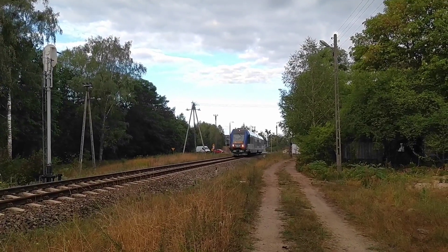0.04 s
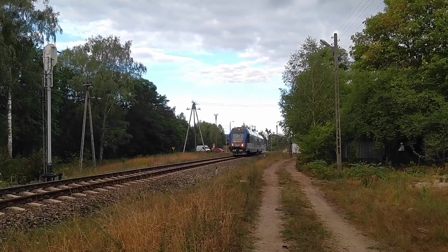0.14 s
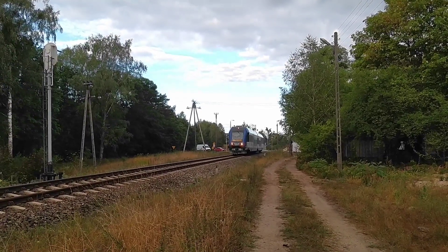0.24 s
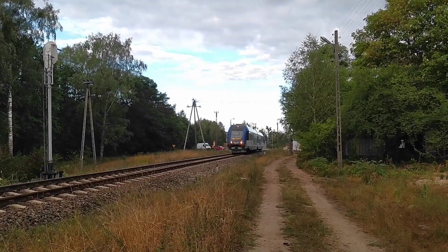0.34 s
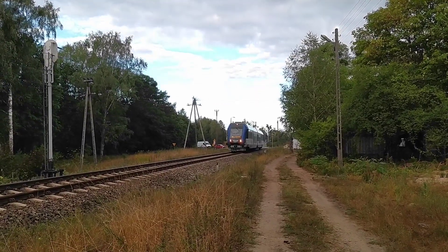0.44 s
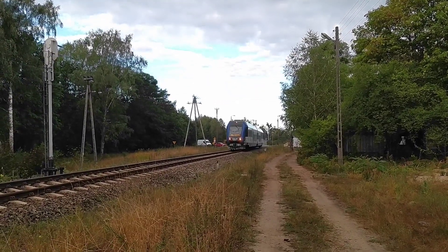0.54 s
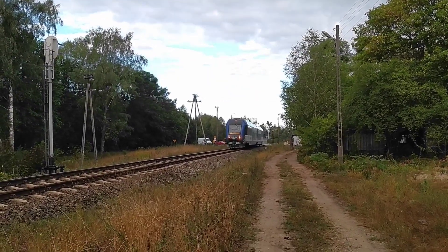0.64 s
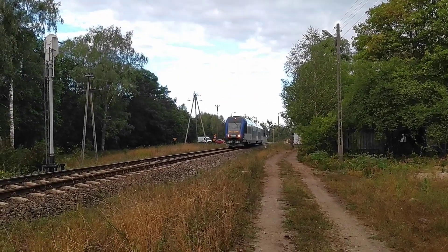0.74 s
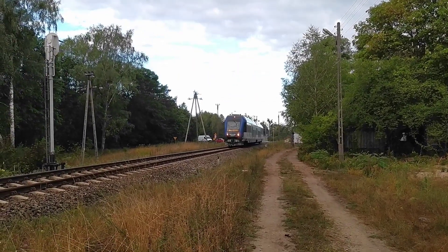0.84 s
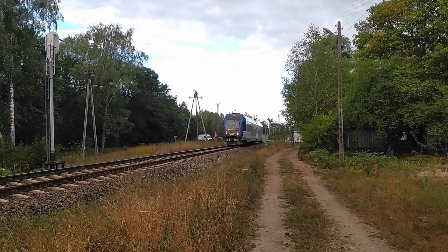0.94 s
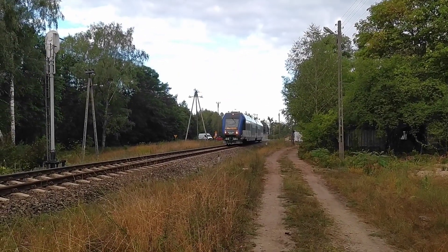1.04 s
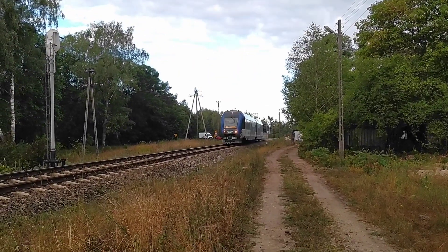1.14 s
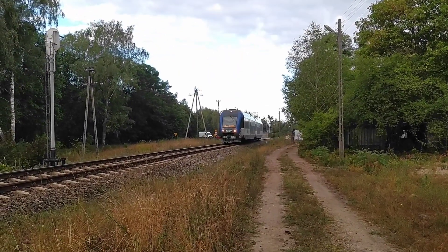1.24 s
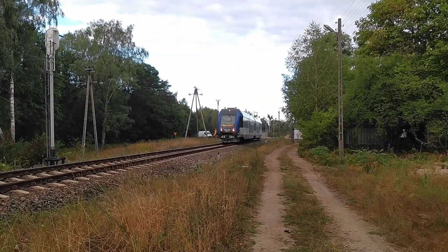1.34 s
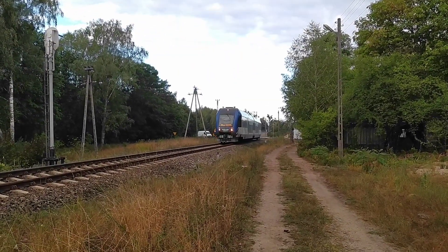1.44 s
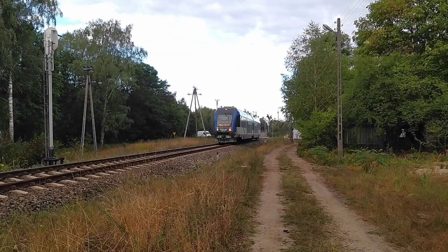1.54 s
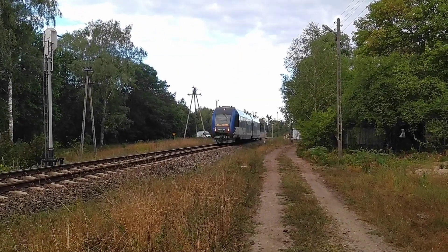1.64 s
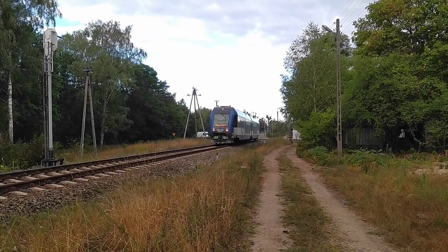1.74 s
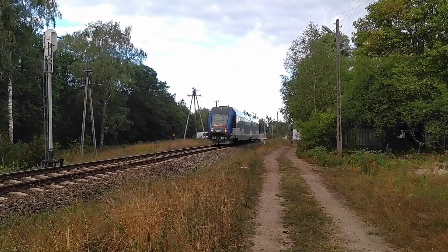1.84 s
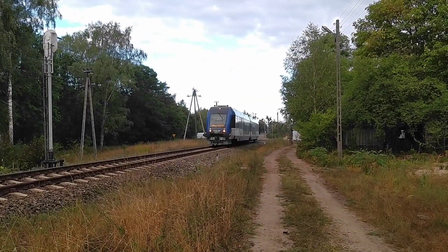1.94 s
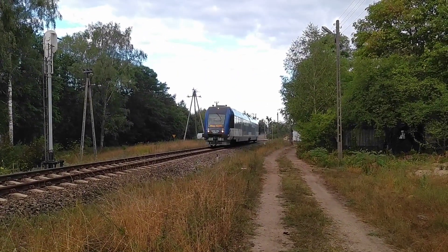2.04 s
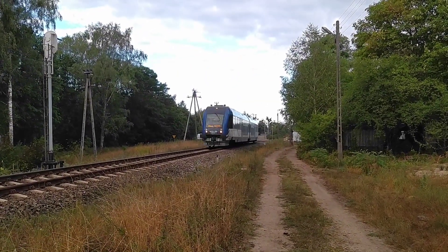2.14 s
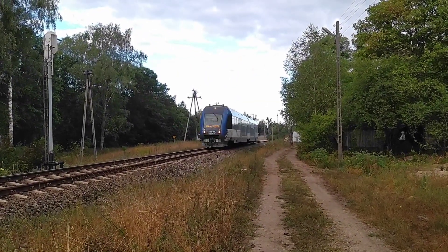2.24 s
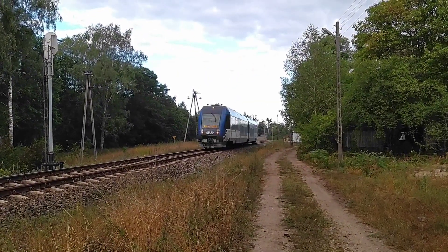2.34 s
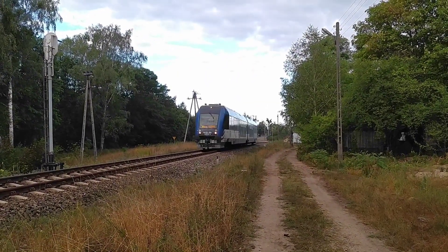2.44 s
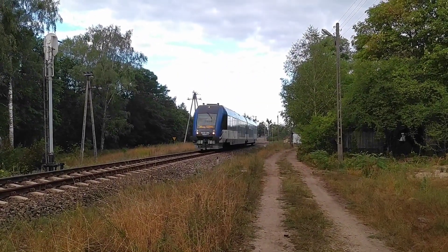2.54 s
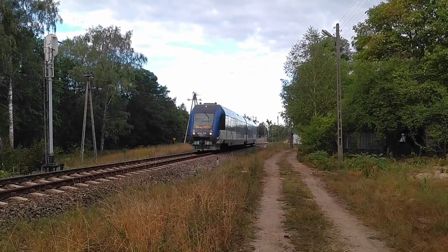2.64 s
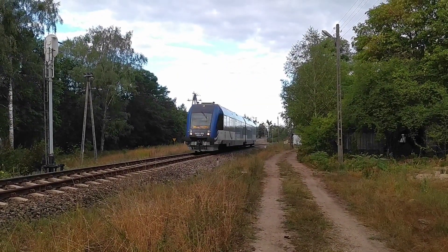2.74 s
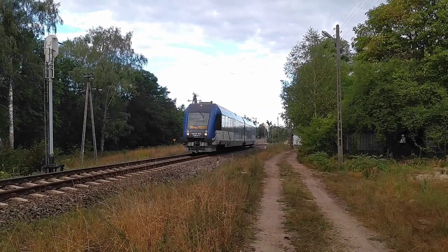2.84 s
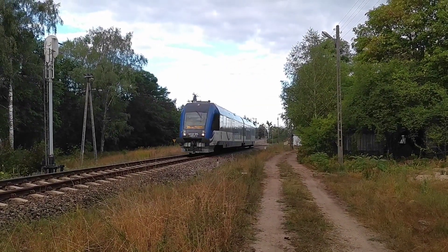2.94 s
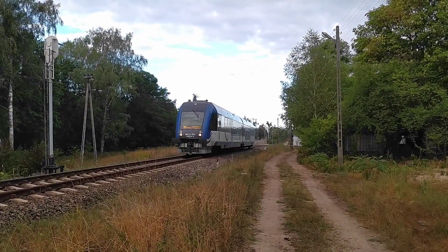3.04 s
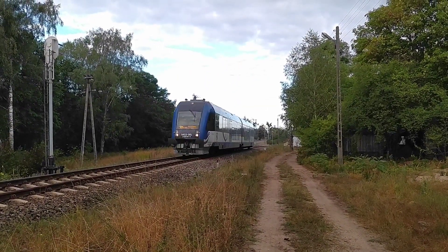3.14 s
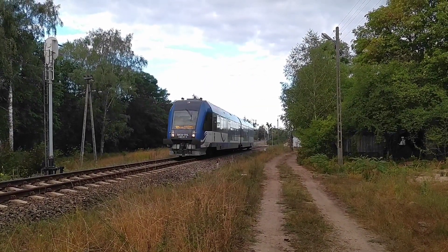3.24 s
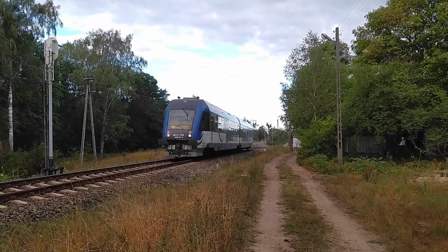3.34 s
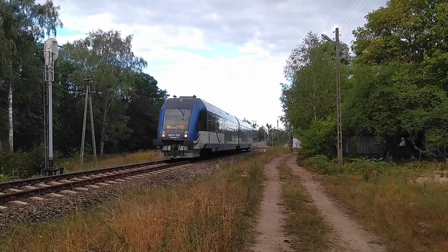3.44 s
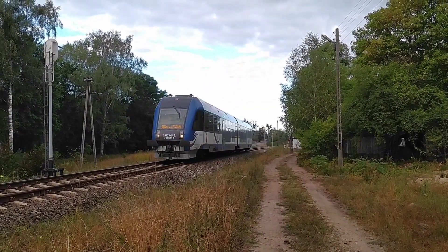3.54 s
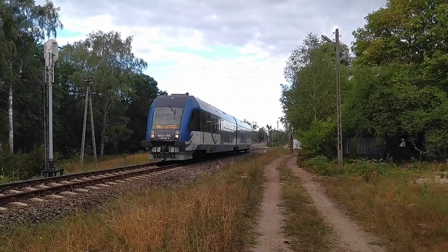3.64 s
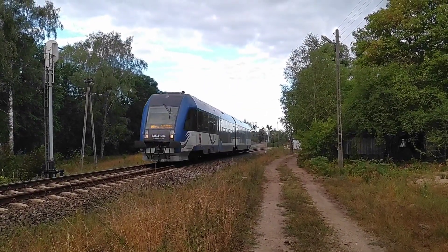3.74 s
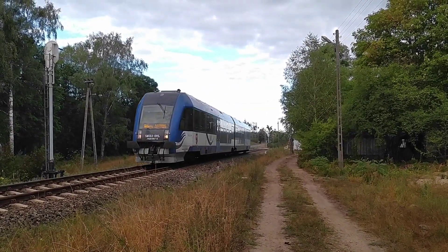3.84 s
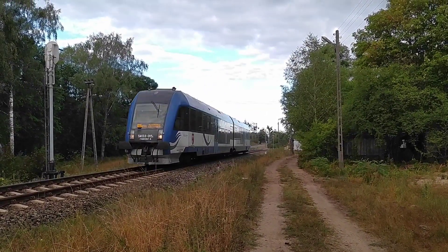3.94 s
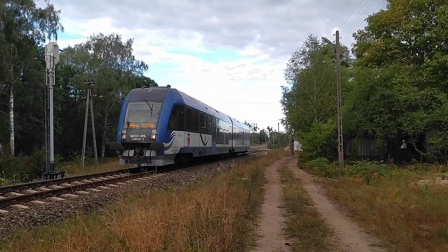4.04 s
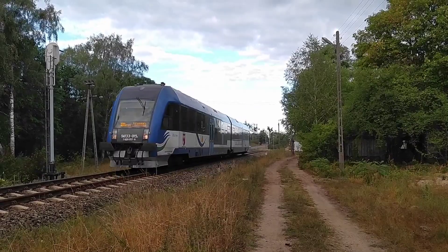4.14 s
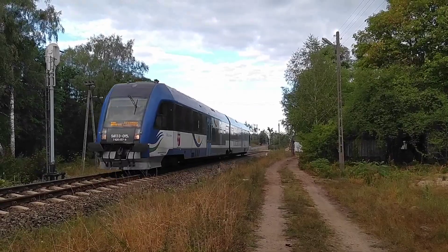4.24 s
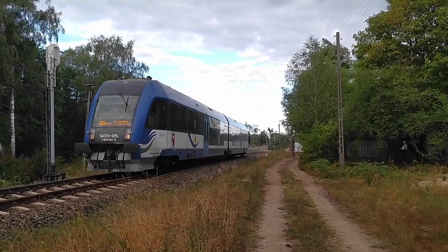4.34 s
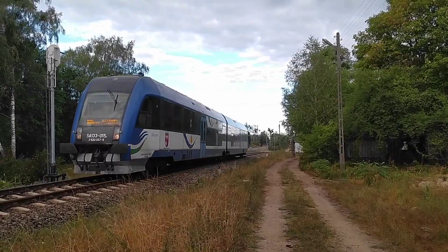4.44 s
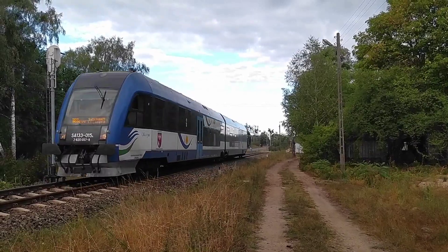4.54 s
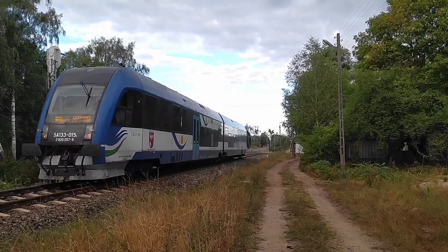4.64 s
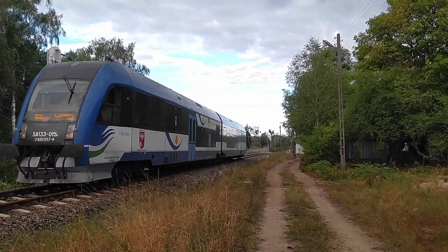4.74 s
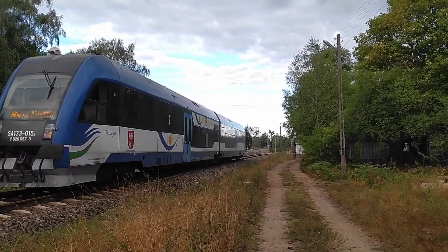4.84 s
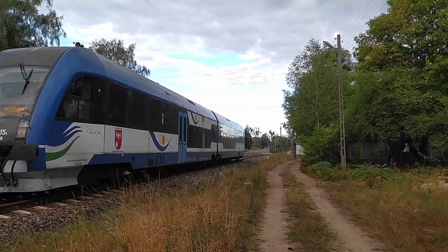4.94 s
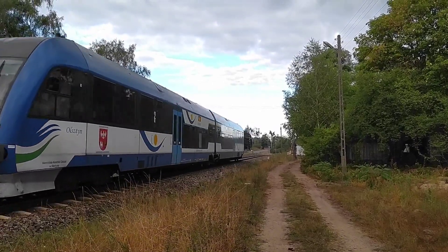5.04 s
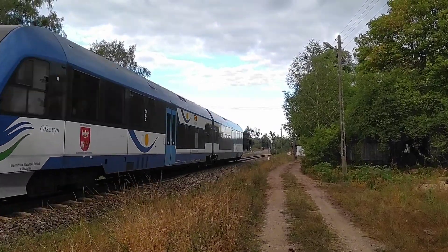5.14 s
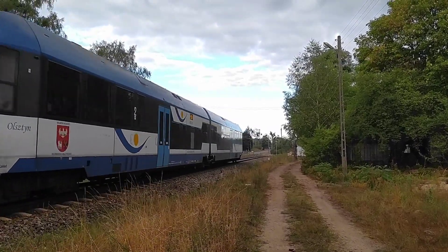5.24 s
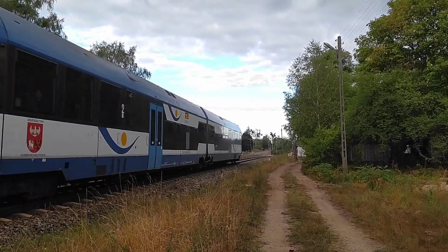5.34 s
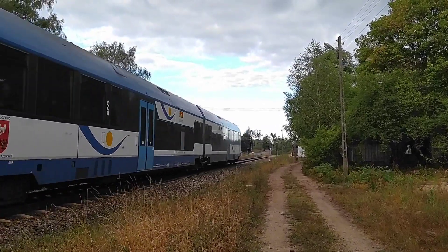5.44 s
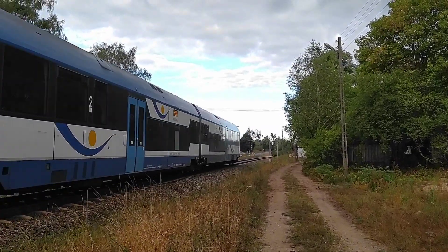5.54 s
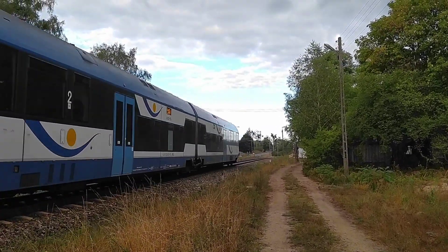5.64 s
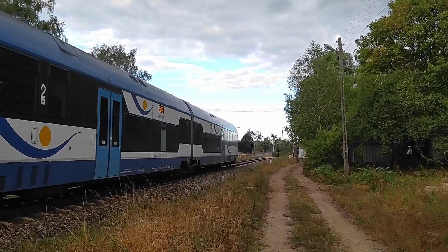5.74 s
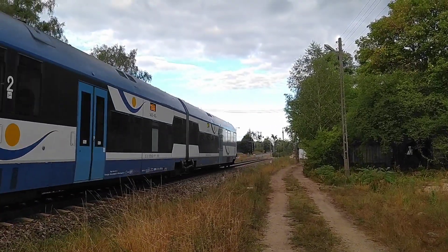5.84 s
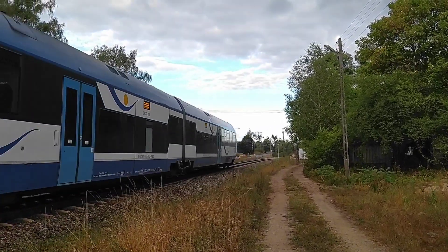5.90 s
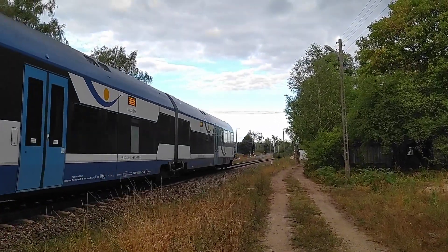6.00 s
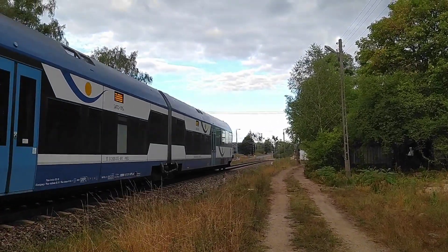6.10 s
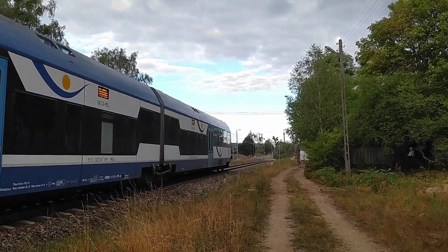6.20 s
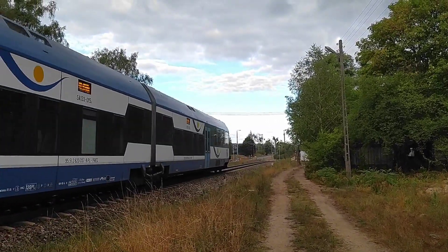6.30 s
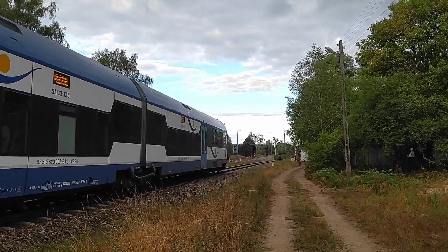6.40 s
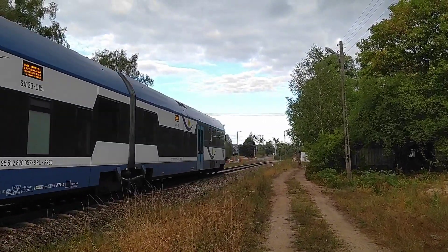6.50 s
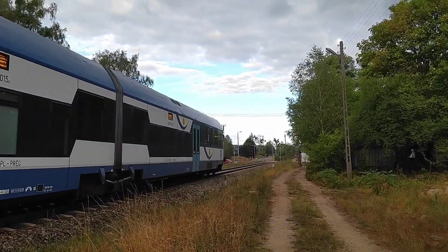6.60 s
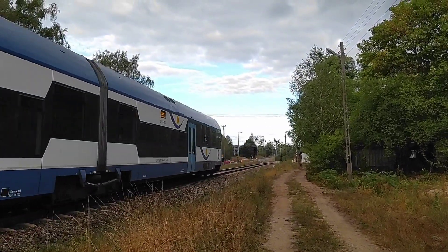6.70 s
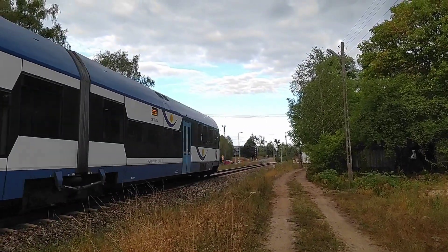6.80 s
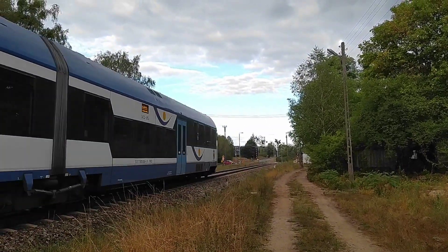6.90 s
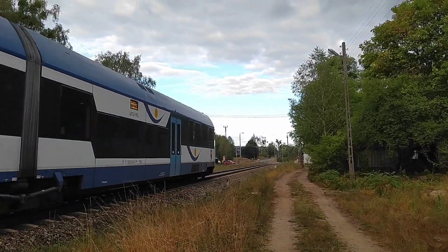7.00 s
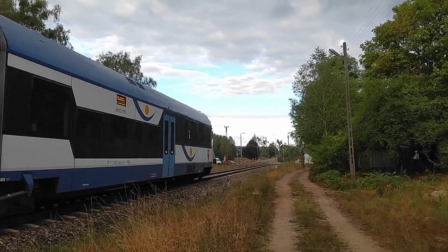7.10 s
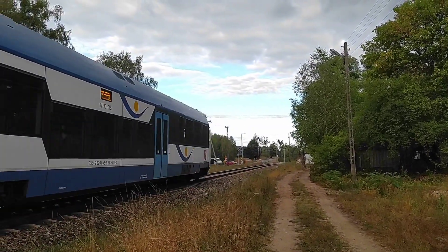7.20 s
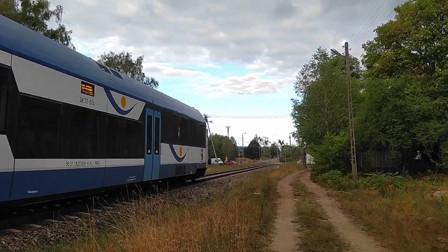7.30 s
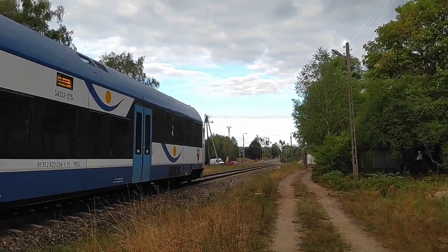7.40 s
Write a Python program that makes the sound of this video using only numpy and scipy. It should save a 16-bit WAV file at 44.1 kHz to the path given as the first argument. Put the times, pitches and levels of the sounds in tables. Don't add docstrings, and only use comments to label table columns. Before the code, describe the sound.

Growing diesel drone and rushing wheel noise swell to a close train pass with two hard rail-joint clanks, while wind wobbles and pops on the left.

```python
import sys
import numpy as np
from scipy import signal
from scipy.fft import rfft, irfft
from scipy.io import wavfile
from scipy.ndimage import uniform_filter1d, map_coordinates

SR = 44100
rng = np.random.default_rng(int(sys.argv[2]) if len(sys.argv) > 2 else 0)


def digitize_waveform(pressure):
    field = np.atleast_2d(pressure).T
    bounded = np.clip(field, -1, 1)
    quanta = np.round(bounded * 32767).astype(np.int16)
    wavfile.write(sys.argv[1], SR, quanta)


def magnitude_from_level(level_db):
    exponent = np.asarray(level_db, float) / 20
    return 10 ** exponent


N = 328986

# pitch in Hz, level in dB.
BLOCKED_PORT = [(3, -42.5), (8, -46), (14, -47.5), (25, -51.5), (42, -57), (60, -67), (90, -76), (150, -93),
                (320, -97.5), (1200, -111), (2800, -117), (3200, -122), (9000, -128), (12300, -130),
                (12700, -200)]
# time in seconds, dB over the breeze.
GUSTS = [(.22, 2.5), (.67, 2.5), (1.0, 3.5), (1.33, 2.2), (1.67, 3.5), (2.0, 7.5), (2.35, 4.5), (2.65, 6.5),
         (3.1, 8.5), (3.33, 6), (3.67, 7), (4.03, 8), (4.3, 5), (4.6, 7), (5.0, 11), (5.55, 9), (6.17, 5),
         (6.67, 6), (7.2, 7)]
# time in seconds, level in dB.
MEMBRANE_POPS = [(0.039, -51), (0.255, -48.5), (1.111, -44.5), (1.498, -56), (1.884, -52), (2.285, -46),
                 (2.954, -38.5), (3.067, -51), (3.134, -57), (3.257, -47), (3.425, -49.4), (3.77, -46.5),
                 (3.896, -52), (4.019, -48), (4.191, -41), (4.48, -53), (4.642, -41), (4.937, -39.5),
                 (5.032, -48), (5.247, -48), (5.726, -44), (6.075, -44), (6.241, -45), (6.407, -50),
                 (7.076, -51), (7.371, -63)]
# start in seconds, first pitch in Hz, last pitch in Hz, length in seconds, level in dB.
BIRDS = [
    (0.7, 4700, 4300, .035, -63),
    (0.711, 7800, 6500, .025, -62),
    (0.95, 4600, 4500, 0.032, -62),
    (0.97, 8000, 6800, 0.011, -58),
    (2.483, 7600, 6700, 0.016, -58),
    (2.68, 7660, 7000, .014, -58),
]
# time in seconds, level in dB.
ROLLING_LEVEL = [(0.0, -60.5), (1.0, -58), (2.0, -56), (3.0, -53.5), (3.65, -51.5), (4.3, -48.5),
                 (4.65, -46.5), (5.0, -44), (5.25, -41.5), (5.7, -37.5), (6.1, -36.5), (6.3, -34),
                 (6.7, -35), (7.0, -38.5), (7.25, -38.5), (7.46, -38.5)]
# pitch in Hz, dB per Hz far off, dB per Hz close by.
ROLLING_COLOUR = [(400, -70, -60), (533, -9, 2.5), (885, -9.5, -4), (1020, -3, -4.5), (1430, -1.5, -6),
                  (1620, -7.5, -2.5), (1920, -9, -6.5), (2370, -12.5, -8.5), (3036, -15.5, -11),
                  (3200, -38.5, -45)]
# pitch in Hz, dB per Hz.
HISS_COLOUR = [(2900, -36), (3150, 0.5), (4000, -2), (4900, 0.5), (6000, -2.5), (7000, -6.5), (7800, -13),
               (8100, -16), (8500, -45)]
# pitch in Hz, dB per Hz far off, dB per Hz close by.
AIR_COLOUR = [(7600, -37, -29), (7560, -4.5, -1.5), (9160, -6, -6.5), (9470, -16, -8),
              (11000, -16.5, -12.5), (12500, -25, -15), (13300, -27, -26), (14300, -38, -36)]
# pitch in Hz, dB per Hz far off, dB per Hz close by.
RUMBLE_COLOUR = [(8, 2, -7), (30, 5, -15), (55, -5, -11), (94, 5, -9), (146, 10.5, 12), (236, 8.5, 5.5),
                 (298.6, 3.5, 3.5), (342, -5, 2), (472.8, -0.5, 2.5), (560, -67, -64.5)]
# pitch in Hz, width in Hz, lift in dB far off, lift
# in dB when the tone beams at the listener, that moment in seconds.
RINGING_TONES = [(165.8, 26, 6, 8.5, 4.16), (265, 44, 0, 6, 5.75), (427, 45, 3.5, 7, 6.8),
                 (635, 98, 8, 10.5, 4.1), (724, 32, 4, -2, 9.1), (1154, 190, 3, 6, 4.04),
                 (1424, 32, -0.5, 12.5, 6.78), (1536, 29, 12.5, 13.5, 4.35), (2323, 225, 9, 11.5, 4.94),
                 (2540, 330, 2.5, 6.3, 6), (2975, 83, 6.5, 11.3, 5.43), (3520, 120, -3, 14.7, 5.67),
               (3690, 56, 4.5, 10.2, 5.8), (4230, 190, 3.5, 6.84, 6.1), (4740, 105, 4.5, 8.5, 5.6),
               (5000, 69, -3, 11.5, 4.56), (5100, 63, -8, 9.3, 3.9), (5580, 90, -2, 8.8, 5.6),
               (6580, 380, 2, 6, 5.6), (7250, 440, 8, 3.4, 4.9)]
# time in seconds, pitch in Hz, dB under the rolling level.
SINGING_WHEEL = [(0, 610, -13), (1.8, 588, -13), (2.8, 609.6, -20), (3.5, 641.6, -8.5), (4.1, 635.5, -15),
                 (4.5, 644.5, -7.5), (5.0, 646, -8.5), (5.3, 644, -3.5), (5.55, 646.4, -8.5),
                 (5.8, 638.3, -24), (7.46, 620, -18)]
# middle in seconds, length in seconds, pitch in Hz,
# dB under the rolling level.
SQUEALS = [
    (5.25, .2, 3690, -20),
    (5.72, .16, 3510, -18),
    (5.55, .2, 2960, -19),
    (6.27, .15, 1465, -14),
    (6.95, .33, 1425, -13),
    (4.7, .3, 640, -12),
]
# time in seconds, clank in dB, thud under it in dB,
# low thud tone in Hz, high thud tone in Hz.
JOINTS = [
    (6.3404, -22.5, -3.5, 187, 226),
    (6.5321, -20.5, -3, 203.4, 271),
]
# pitch in Hz, level in dB.
CLANK_COLOUR = [(300, 0), (600, 0.5), (1000, -1), (1500, 0), (2000, -2), (3000, -6), (4200, -14),
                (5300, -13), (7500, -25), (10000, -45)]
# pitch in Hz, level in dB, time in seconds to fade by 60 dB.
RAIL_END_RING = [(1480, -1, .05), (1850, -5, .04), (2650, -7, .04)]
# time in seconds, pitch in Hz, dB under the rolling level.
TURBO = [(0, 6500, -42), (1, 6270, -23), (1.6, 6150, -16), (2, 5885, -19), (2.6, 5760, -12),
         (3.2, 5580, -12), (4, 5510, -13), (4.45, 5427, -9.5), (4.7, 5380, -7.5), (5.2, 5240, -10.5),
         (5.7, 5155, -12.5), (6.4, 5216, -11.5), (6.9, 5203, -18.5), (7.1, 5084, -36), (7.46, 5120, -13)]
# time in seconds, firing rate in Hz, firing tone in dB, tone at twice that rate in dB.
EXHAUST = [(0.0, 68.5, -58, -52), (0.3, 68.46, -55.5, -47), (1.5, 67.2, -50.5, -52), (2.2, 67.26, -48, -43),
           (2.75, 66.55, -44, -46.5), (3.1, 66.3, -40, -41.5), (3.6, 65.83, -40.5, -46),
           (4.0, 65, -41.5, -41.5), (4.3, 64.96, -40.5, -47), (4.75, 64.1, -35.5, -41.5),
           (5.25, 63.8, -34, -48.5), (5.6, 63, -31.5, -86), (5.9, 62.45, -32, -38.5),
           (6.4, 61.67, -31.5, -35), (6.75, 60.2, -33, -32), (7.14, 60.15, -30, -43),
           (7.26, 58.75, -40, -46), (7.4, 58.5, -30.5, -48)]
# multiple of the firing rate, dB under the rolling level far off,
# the same in dB close by.
SIDE_TONES = [(4 / 3, -32, -22), (1.1, -5.5, -34), (7 / 3, -7, -16.5), (3, -4.5, -21)]
# pitch in Hz, dB over the usual level needed to pass.
TREBLE_GATE = [(8000, -30), (9200, -7), (9500, .5), (12000, 1), (12700, 6), (13300, 9.5), (14200, 13)]

OPEN_PORT_DB = 6


def evened(x):
    return x / np.sqrt(np.mean(x ** 2) + 1e-20)


def read(points, hz):
    f, *columns = np.transpose(points)
    return [np.interp(np.log(hz + 1), np.log(f + 1), column)[:, None] for column in columns]


def follow(rows, t):
    s, *columns = np.transpose(rows)
    return [np.interp(t, s, column) for column in columns]


def add(mix, s, sound):
    part = mix[round(s * SR):][:len(sound)]
    part += sound[:len(part)]


def bell(t, at, length):
    return np.exp(-((t - at) / length) ** 2)


def drift(per_s, step=64):
    at = np.arange(0, N + step, step)
    wander = map_coordinates(rng.standard_normal(2000), [at / SR * per_s], order=3)
    return np.interp(np.arange(N), at, wander)


def resonate(x, hz, width):
    turn = np.exp(2j * np.pi * np.cumsum(hz * np.ones(len(x))) / SR)
    r = np.exp(-np.pi * width / SR)
    return 2 * (turn * signal.lfilter([1 - r], [1, -r], x / turn)).real


def grid(size):
    hop = size // 4
    return np.fft.rfftfreq(size, 1 / SR), np.arange(N // hop + 5) * hop / SR


def noise(gain, size):
    a, b = rng.standard_normal((*gain.shape[::-1], 2)).T
    sound = signal.istft((a + 1j * b) * gain, nperseg=size, noverlap=size - size // 4)[1]
    return sound[:N] / np.sqrt(3 / 4)


def unit(db):
    return magnitude_from_level(db) / np.linalg.norm(magnitude_from_level(db), axis=0)


def whistle(hz, waver_hz, waver_db, per_s):
    shaken_hz = hz + waver_hz * drift(per_s)
    strength_db = waver_db * drift(per_s) + 1.0 * drift(per_s=9.0)
    return evened(magnitude_from_level(strength_db) * np.sin(2 * np.pi * np.cumsum(shaken_hz) / SR))


def loudness(t):
    return follow(ROLLING_LEVEL, t)[0] + OPEN_PORT_DB


def layer_level(t, far_db, ahead_db, bay_db, behind_db):
    return np.interp(t, [5.5, 5.31, 6, 6.93], [far_db, ahead_db, bay_db, behind_db])


def pop(db, sign):
    t = np.arange(2600) / SR
    hz = 55 + 330 * np.exp(-t / 0.00592)
    swell = (t / 0.009) ** 1.4 * np.exp(1 - t / 0.01)
    return sign * magnitude_from_level(db + 5.5) * np.sin(2 * np.pi * np.cumsum(hz) / SR) * swell


def blocked_port(size=8192):
    hz, t = grid(size)
    breeze_db = np.interp(t, [0, N / SR], [-33, -31])
    gust_db = breeze_db + sum(db * bell(t, s, length=0.14) for s, db in GUSTS)
    share = 1 / (1 + (hz[:, None] / 400) ** 2)
    out = noise(unit(read(BLOCKED_PORT, hz)[0]) * magnitude_from_level(share * (gust_db + 31.5) - 33), size)
    signs = rng.choice([-1., 1.], (len(MEMBRANE_POPS), 1))
    for (s, db), sign in zip(MEMBRANE_POPS, signs):
        add(out, max(s - .008, 0), pop(db, sign))
    return out


def bird(start_hz, end_hz, length, db):
    t = np.arange(0, length, 1 / SR)
    hz = start_hz + (end_hz - start_hz) * t / length
    breath = rng.standard_normal(len(t))
    rough = resonate(resonate(breath, hz, width=630), hz, width=630)
    return magnitude_from_level(db) * evened(rough) * signal.windows.tukey(len(t), .6)


def joint(clank_db, thud_db, low_hz, high_hz):
    t = np.arange(6000) / SR
    hz = np.fft.rfftfreq(len(t), 1 / SR)
    colour = magnitude_from_level(read(CLANK_COLOUR, hz)[0][:, 0])
    rattle = evened(irfft(rfft(rng.standard_normal(len(t))) * colour))
    fade = magnitude_from_level(-60 * t / .085) + .25 * magnitude_from_level(-60 * t / .35)
    clank = rattle * (1 - np.exp(-t / .0004)) * fade
    ring = 0
    for f, db, t60 in RAIL_END_RING:
        ring = ring + magnitude_from_level(db - 60 * t / t60) * np.sin(2 * np.pi * f * rng.uniform(0.95, 1.02) * t)
    swing = np.sin(2 * np.pi * low_hz * t) + 0.72 * np.sin(2 * np.pi * high_hz * t + 1.15)
    thud = swing * (t / 0.0084) ** 2 * np.exp(2 - 2 * t / 0.017) / 3
    return magnitude_from_level(clank_db + 2.5) * (clank + ring + magnitude_from_level(thud_db) * thud)


def squeals():
    t = np.arange(N) / SR
    out = 0
    for s, length, hz, db in SQUEALS:
        tone = whistle(hz, waver_hz=16, waver_db=4.5, per_s=30)
        out = out + magnitude_from_level(loudness(t) + db) * bell(t, s, length) * tone
    return out


def singing_wheel():
    t = np.arange(N) / SR
    hz, under_db = follow(SINGING_WHEEL, t)
    return magnitude_from_level(loudness(t) + under_db) * whistle(hz, waver_hz=15, waver_db=4, per_s=35)


def gearbox():
    t = np.arange(N) / SR
    tooth_hz = 166
    hum = whistle(tooth_hz, waver_hz=1.5, waver_db=1.5, per_s=8)
    hum = hum + magnitude_from_level(-13) * whistle(2 * tooth_hz, waver_hz=3, waver_db=2, per_s=8)
    return magnitude_from_level(loudness(t) - 3) * bell(t, at=4.4, length=1.1) * hum


def turbo():
    t = np.arange(N) / SR
    hz, under_db = follow(TURBO, t)
    core = whistle(hz, waver_hz=30, waver_db=4, per_s=70)
    halo = resonate(resonate(rng.standard_normal(N), hz, width=750), hz, width=760)
    return magnitude_from_level(loudness(t) + under_db) * (magnitude_from_level(-3.5) * core + magnitude_from_level(-5) * evened(halo))


def rolling(size=1024):
    hz, t = grid(size)
    rumble_db = layer_level(t, far_db=-6, ahead_db=-5.5, bay_db=-7.5, behind_db=-3.5)
    hiss_db = layer_level(t, far_db=-10, ahead_db=-9.5, bay_db=-5.5, behind_db=-12)
    air_db = layer_level(t, far_db=-25.5, ahead_db=-32, bay_db=-21.5, behind_db=-26.5)
    near = np.interp(t, [3.0, 6.0], [0, 1])
    lift_db = 0
    for f, width, far_db, beam_db, at in RINGING_TONES:
        beam = np.interp(t, [at - 1, at, at + 1], [far_db, beam_db, 2.5])
        fading = 1 + .13 * drift(per_s=6.0)[np.minimum(t * SR, N - 1).astype(int)]
        lift_db = lift_db + beam * fading / (1 + (2 * (hz[:, None] - f) / width) ** 2)
    layers = ((ROLLING_COLOUR, 0), (RUMBLE_COLOUR, rumble_db + 4.0), (HISS_COLOUR, hiss_db),
              (AIR_COLOUR, air_db))
    power = 0
    for colour, db in layers:
        columns = read(colour, hz)
        far_db, near_db = columns[0], columns[-1]
        power = power + (magnitude_from_level(db) * unit(far_db + near * (near_db - far_db) + lift_db)) ** 2
    patches = uniform_filter1d(rng.standard_normal(power.T.shape).T, size=14, axis=0)
    patches = evened(uniform_filter1d(patches, size=8, axis=1))
    flicker = evened(uniform_filter1d(rng.standard_normal(len(t)), size=4))
    return noise(np.sqrt(power) * magnitude_from_level(loudness(t) + 0.99 * patches + .5 * flicker), size)


def exhaust():
    t = np.arange(N) / SR
    hz, firing_db, second_db = follow(EXHAUST, t)
    uneven_db = np.interp(t, [.3, 3.0], [-68, -52]) + 15 * bell(t, at=6.1, length=0.8)
    uneven_db = uneven_db + 7 * drift(per_s=4.7)
    level_db = loudness(t)
    near = np.interp(t, [.6, 2.8], [0, 1])
    angle = 2 * np.pi * np.cumsum(hz) / SR
    out = magnitude_from_level(uneven_db) * np.cos(angle * 2 / 3)
    out += magnitude_from_level(firing_db + OPEN_PORT_DB) * np.cos(angle)
    out += magnitude_from_level(second_db + OPEN_PORT_DB) * np.cos(2 * angle - .6)
    for multiple, far_db, near_db in SIDE_TONES:
        wavering_db = level_db + far_db + near * (near_db - far_db) + 2.3 * drift(per_s=3.97)
        out += magnitude_from_level(wavering_db) * np.cos(multiple * angle + 2 * np.pi * rng.random())
    return np.sqrt(2) * out


def scene():
    right = squeals() + singing_wheel() + gearbox() + turbo() + rolling() + exhaust()
    for s, *call in BIRDS:
        add(right, s, bird(*call))
    for s, *blow in JOINTS:
        add(right, s, joint(*blow))
    leak = signal.lfilter(*signal.butter(2, 60, fs=SR), right)
    left = blocked_port() + magnitude_from_level(-19) * leak
    fade_in = np.minimum(np.arange(N) / SR / .02, 1)
    return np.array([left, right]) * fade_in


def gate(x):
    hz, _, cells = signal.stft(x, SR, "cosine", nperseg=2048)
    cell_db = 10 * np.log10(uniform_filter1d(abs(cells) ** 2, size=3, axis=0) + 1e-30)
    treble_db = uniform_filter1d(cell_db[(hz > 9000) & (hz < 12000)].mean(0), size=7)
    cell_db = cell_db - .75 * treble_db
    usual_db = np.median(cell_db, axis=1)[:, None]
    keep = cell_db - usual_db > read(TREBLE_GATE, hz)[0]
    return signal.istft(cells * keep, SR, "cosine", nperseg=2048)[1][:N]


def roll_off(x):
    return signal.sosfilt(signal.butter(12, 14190, fs=SR, output="sos"), x)


def record(dry):
    gated = np.array([gate(port) for port in dry])
    return roll_off(gated)


dry = scene()
out = record(dry)
digitize_waveform(out)
```